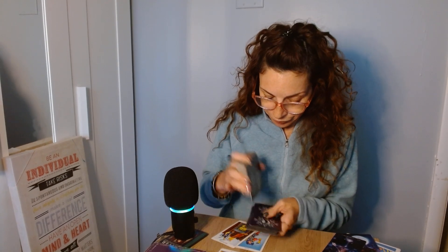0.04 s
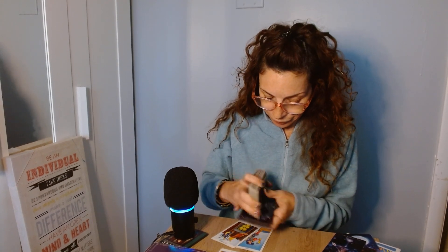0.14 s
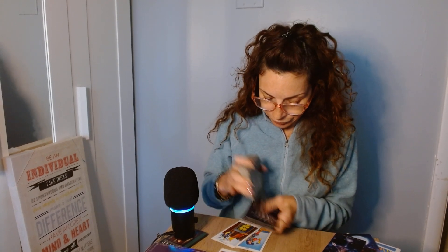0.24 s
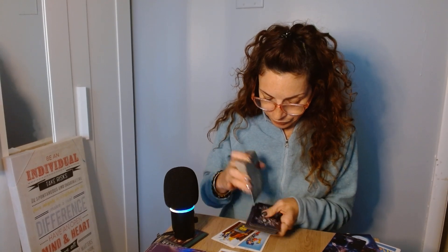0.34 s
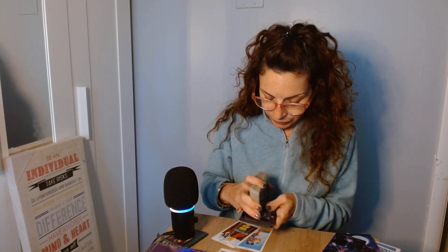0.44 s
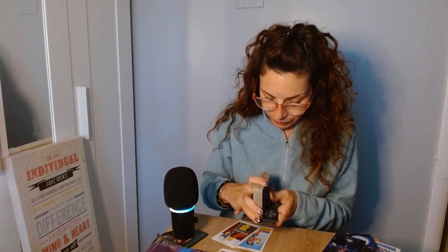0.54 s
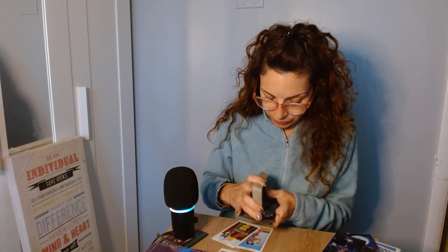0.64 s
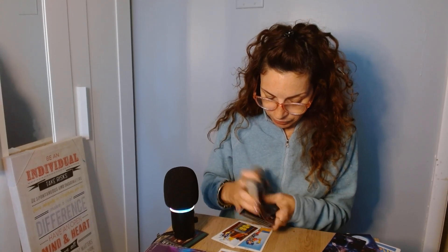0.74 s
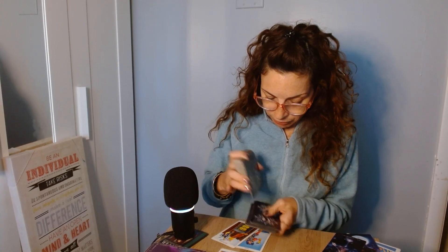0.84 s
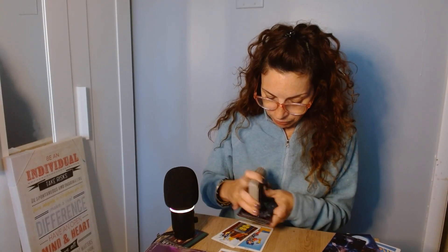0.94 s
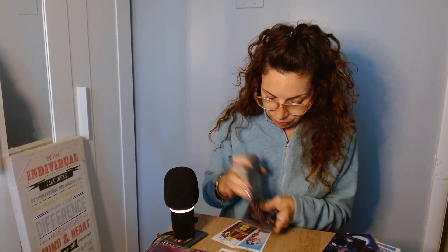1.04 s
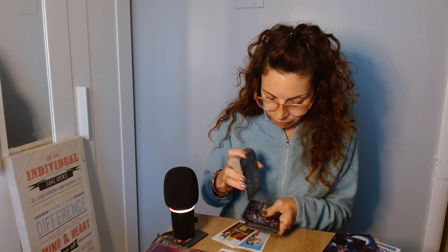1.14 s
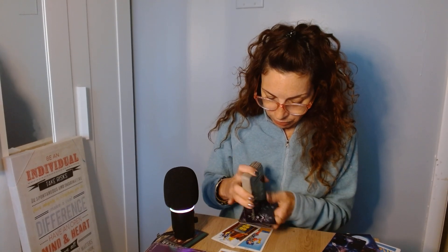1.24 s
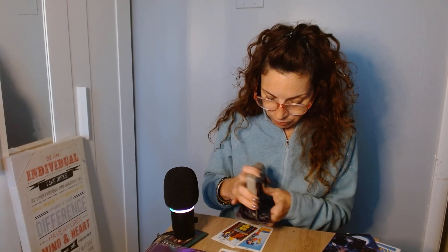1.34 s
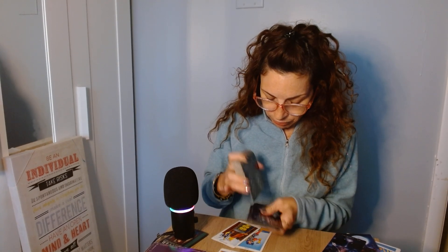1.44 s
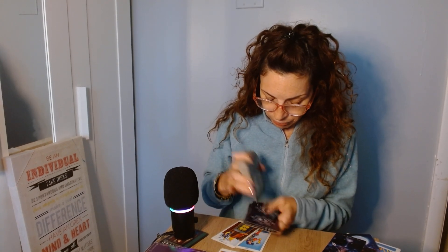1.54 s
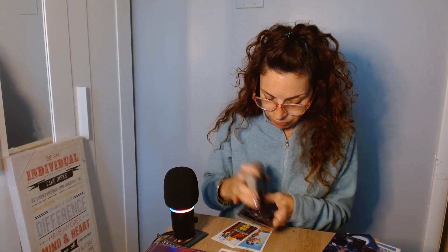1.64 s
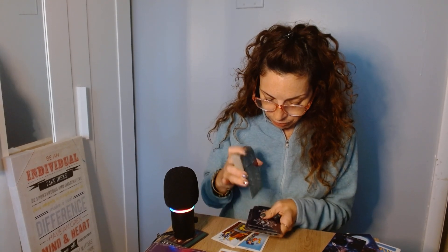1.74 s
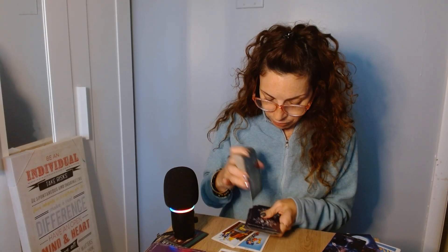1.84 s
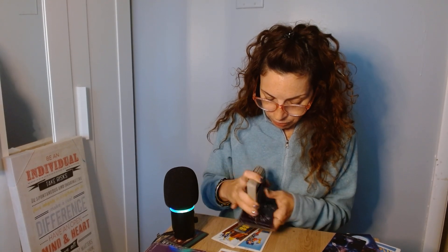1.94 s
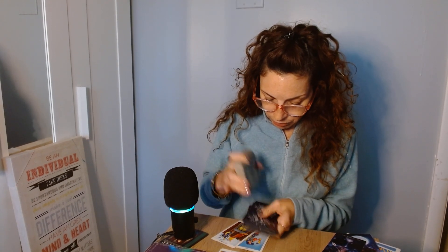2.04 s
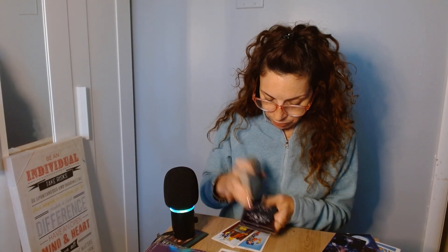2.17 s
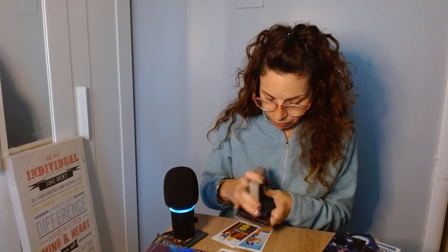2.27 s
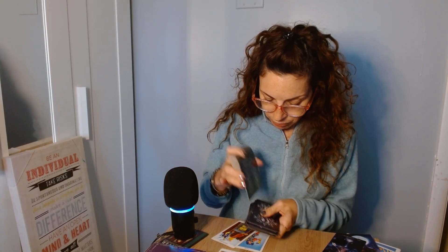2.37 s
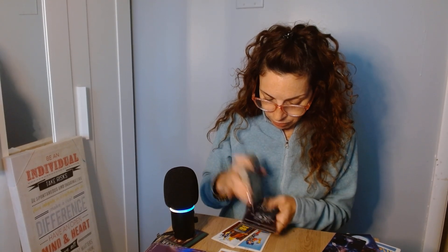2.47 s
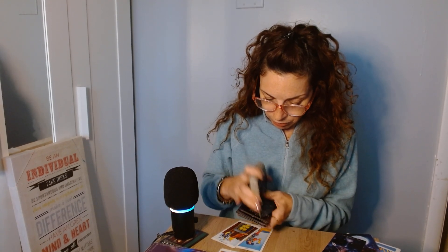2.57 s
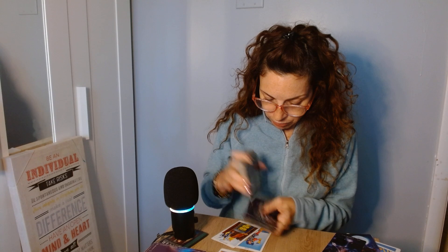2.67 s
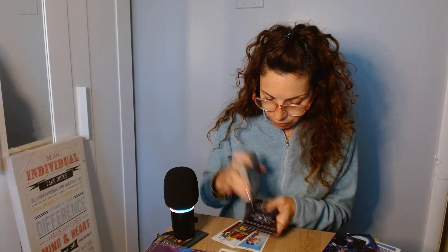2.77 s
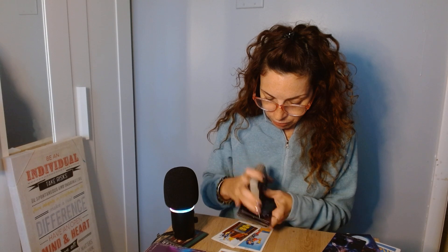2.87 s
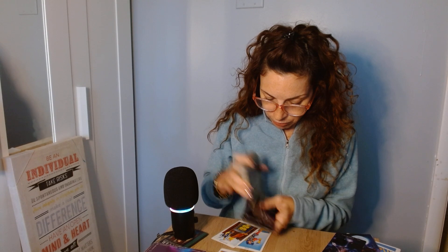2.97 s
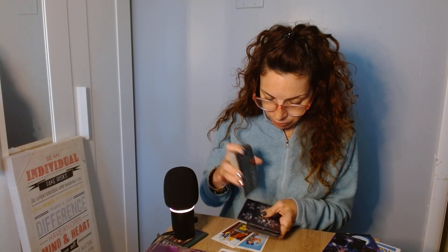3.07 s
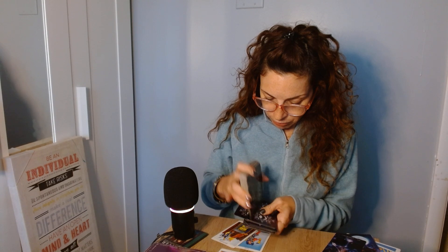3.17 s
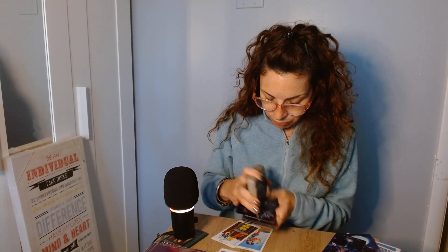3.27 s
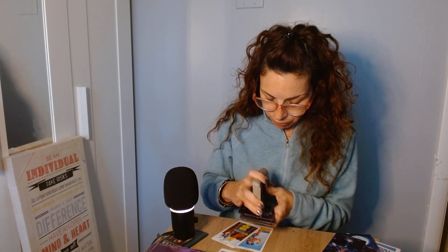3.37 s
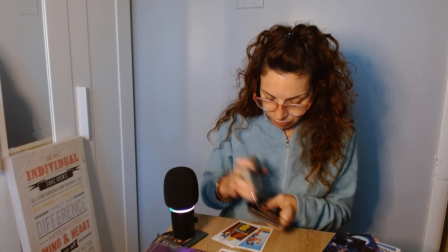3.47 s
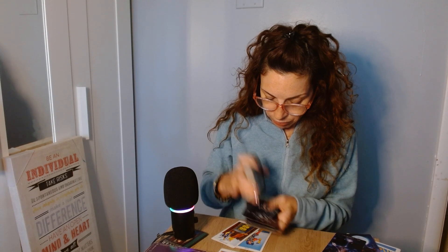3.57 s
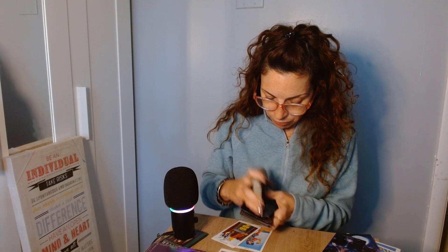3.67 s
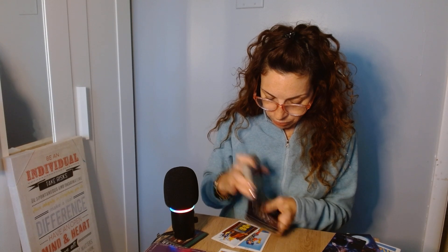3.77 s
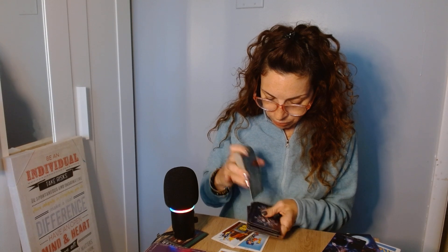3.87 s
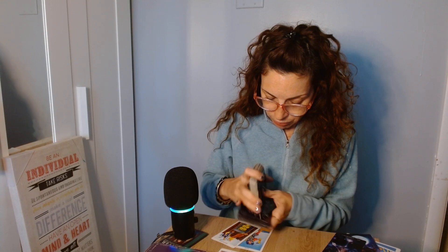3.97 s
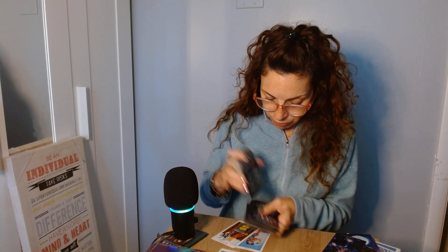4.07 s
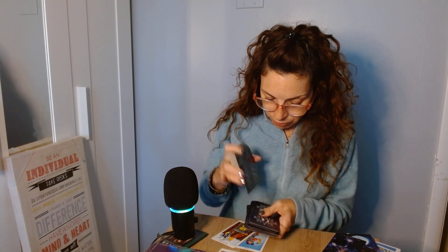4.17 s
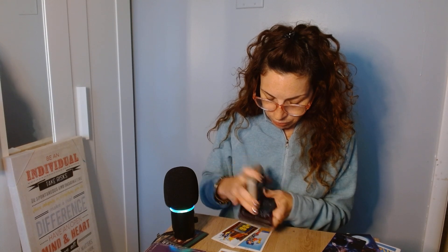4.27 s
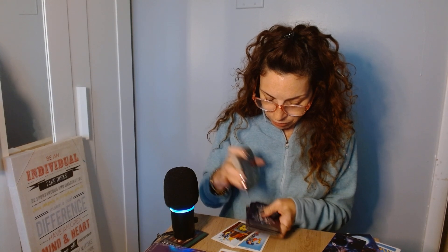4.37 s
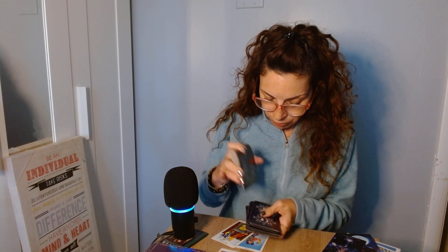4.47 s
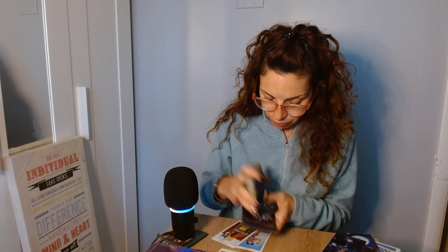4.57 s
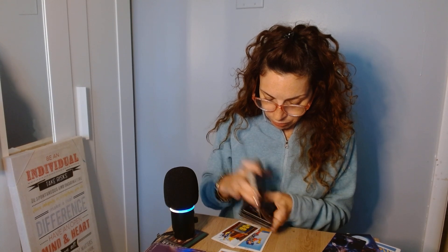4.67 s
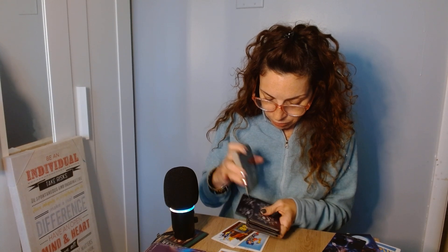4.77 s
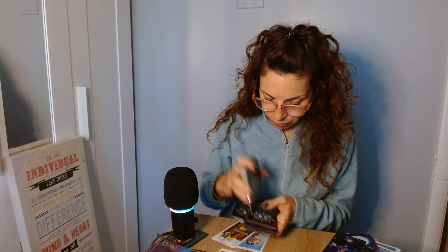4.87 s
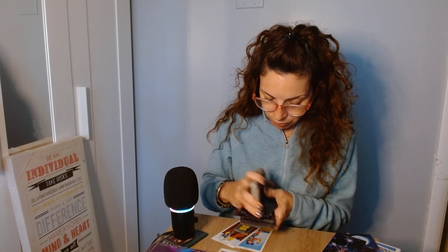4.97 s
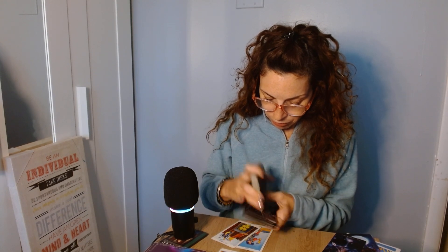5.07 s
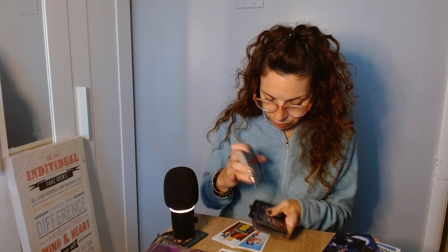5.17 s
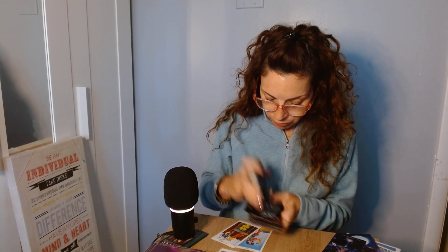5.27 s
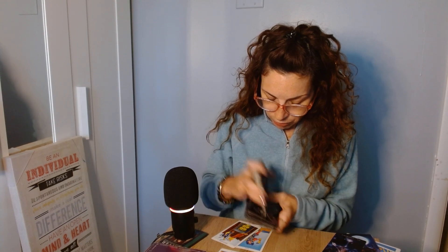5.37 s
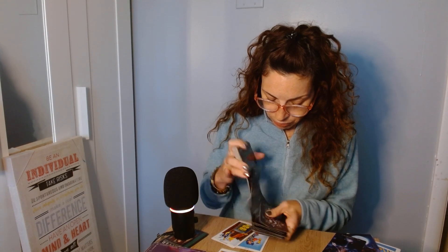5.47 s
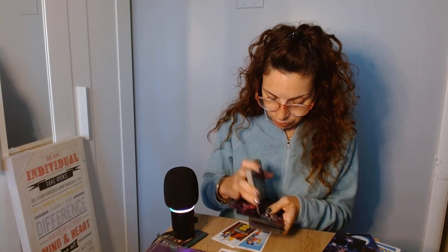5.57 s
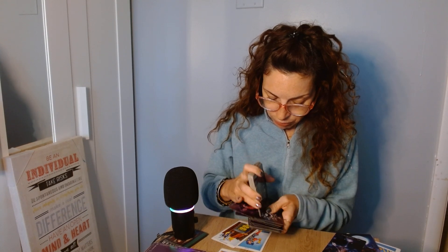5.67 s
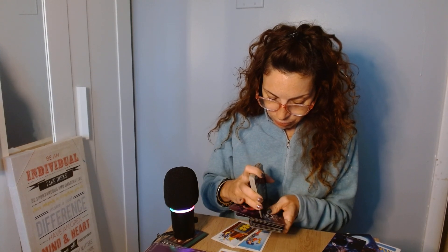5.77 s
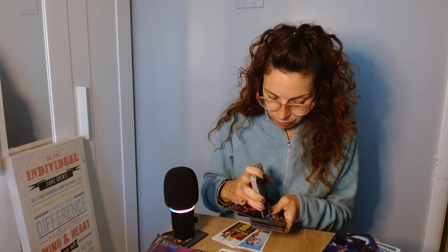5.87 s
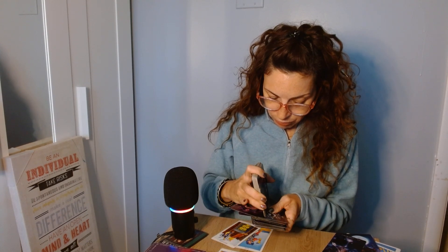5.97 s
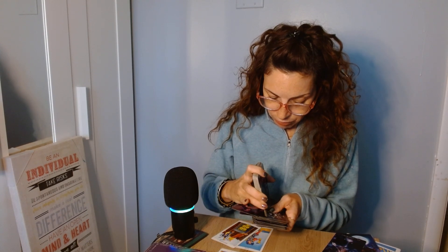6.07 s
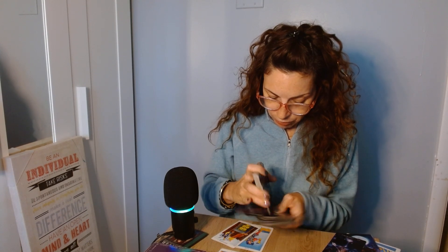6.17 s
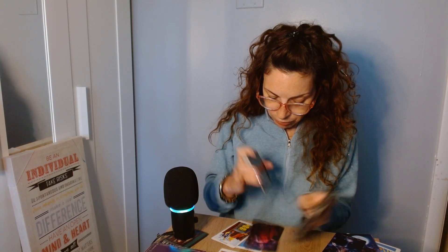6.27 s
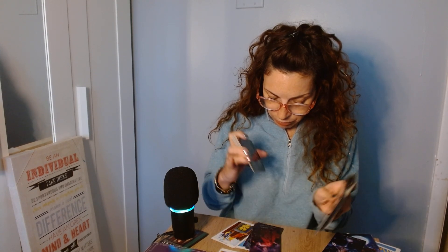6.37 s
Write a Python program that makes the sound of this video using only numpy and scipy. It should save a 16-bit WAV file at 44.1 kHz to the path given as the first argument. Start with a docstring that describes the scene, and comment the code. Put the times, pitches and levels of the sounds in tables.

```python
"""Shuffling a deck of cards

A deck of stiff cards is shuffled overhand above a wooden table, close to a desk microphone in a small quiet room.
Packets slide off the deck with a hiss (shaped noise), and card edges click and slap (short decaying tones).
Each drop thumps into the palm and shakes the table (low pulses and noise); after a pause the hands start again.
Mains hum, a thin whine (both sine waves) and faint hiss lie under it."""
import sys
import numpy as np
from scipy import signal
from scipy.fft import rfft, irfft
from scipy.io import wavfile
from scipy.ndimage import uniform_filter1d

SR = 44100
rng = np.random.default_rng(int(sys.argv[2]) if len(sys.argv) > 2 else 0)


def put_to_file(sound):
    """Save the sound as 16-bit audio at rate SR, in the file named by the first command-line argument."""
    columns = np.atleast_2d(sound).T  # one column per channel
    safe = np.clip(columns, -1, 1)
    whole_steps = np.round(safe * 32767)
    wavfile.write(sys.argv[1], SR, whole_steps.astype(np.int16))


def volts_from_decibels(level):
    """Turn decibel levels (scalar or array-like) into linear amplitude factors."""
    exponent = np.asarray(level, float) / 20
    return 10 ** exponent


N = 282681
TIME = np.arange(N) / SR


def unit(x):
    """Scales a sound to rms 1, so that a level can be set afterwards."""
    return x / np.sqrt(np.mean(x ** 2))


def resonate(x, peaks):
    """Sum of resonances, each letting through a band of x around its own pitch."""
    total = 0
    for hz, width_hz, db in peaks:
        total = total + volts_from_decibels(db) * signal.lfilter(*signal.iirpeak(hz, hz / width_hz, SR), x)
    return total


def ring(t, hz, t60_s, phase=0.):
    """One ringing tone that falls by 60 dB in t60_s."""
    return np.exp(-np.log(1000) * t / t60_s) * np.sin(2 * np.pi * hz * t + phase)


def walk(rate_hz):
    """A slowly wandering random curve: levels held for 1 / rate_hz seconds, smoothed twice; spread near 1."""
    hold = int(SR / rate_hz)
    steps = np.repeat(rng.standard_normal(N // hold + 1), hold)
    return 1.15 * uniform_filter1d(uniform_filter1d(steps, hold), hold)[:N]


def add(out, start_s, sound):
    """Mixes a short sound in at start_s."""
    i = int(start_s * SR)
    out[i:i + len(sound)] += sound[:N - i]


def quiet():
    """Hiss (shaped noise), wavering mains hum and a thin electrical whine (sine waves)."""
    hiss_db, hum_db, whine_db = -77, -75.5, -99  # rms levels
    hum_hz, whine_hz = 60, 2584
    # Tone colour of the hiss. Each row: frequency in Hz, relative level in dB per Hz.
    hiss_colour = [(25, 8.5), (100, 0.5), (400, -13.5), (1000, -16), (3000, -19), (9000, -23),
                   (16000, -30.5)]
    hz, db = np.transpose(hiss_colour)
    bins_hz = np.maximum(np.fft.rfftfreq(N, 1 / SR), 10)
    colour = volts_from_decibels(np.interp(np.log(bins_hz), np.log(hz), db))
    hiss = irfft(rfft(rng.standard_normal(N)) * colour, N)
    hum = volts_from_decibels(hum_db + 2.7 * walk(25)) * np.sin(2 * np.pi * hum_hz * TIME)
    whine = volts_from_decibels(whine_db + 2 * walk(23)) * np.sin(2 * np.pi * whine_hz * TIME)
    return volts_from_decibels(hiss_db) * unit(hiss) + np.sqrt(2) * (hum + whine)


def rubbing():
    """Card on card: grainy friction noise in a dull and a bright band, with stray ticks and hand rumble."""
    # Fingers and cards rubbing between the strokes, still during the pause.
    # Each row: time in seconds, level in dB.
    rustle = [(0, -55.5), (.05, -66), (.12, -69.5), (.3, -71), (2.2, -76), (5.66, -72), (5.74, -100),
              (6.11, -100), (6.14, -77.5), (6.2, -71.5), (6.41, -83)]
    # Packets sliding off the deck until they catch.
    # Each row: time of the catch in seconds, level in dB, swell in ms, brightness (bright over dull) in dB.
    slides = [(0.27, -33.5, 20, 2.5), (.529, -53, 8, -8), (.745, -42, 22, -12.5), (0.793, -33, 22, -12.5),
              (1.121, -39, 43.4, -3), (1.24, -56.5, 28, 3.5), (1.328, -55, 14, -8), (1.426, -38.5, 31, -12),
              (1.442, -27.5, 6.3, -7), (1.671, -46, 16, -15), (1.702, -32.5, 10, 4.5),
              (1.929, -56.5, 16, -25), (2.015, -50, 16, -6), (2.043, -33, 8, -8.5),
              (2.279, -55.5, 6.7, -1.5), (2.363, -26, 6.5, 7.5), (2.664, -30.5, 12, -3),
              (2.832, -56, 5.7, 29), (2.942, -38, 11, -9.5), (2.975, -40.5, 29, -5.5),
              (3.006, -27.5, 13, 9.5), (3.437, -41.5, 33, -16.5), (3.477, -34, 19, -19.5),
              (3.734, -44.5, 16, -10.5), (3.784, -33, 17, 2.5), (4.086, -35.5, 22, -2.5),
              (4.304, -50.5, 8, -2.5), (4.335, -49, 5.9, -0.5), (4.379, -33, 19, -7), (4.547, -53, 5.2, 32),
              (4.715, -41.5, 22, -6), (4.763, -42.5, 70, -9), (4.78, -42.5, 10, -7), (4.878, -54, 12, 18),
              (4.947, -52, 21, 0), (5.089, -41.5, 12, -16), (5.125, -30.5, 12, -22), (5.616, -55, 73, -1),
              (5.697, -53.5, 3.9, -27), (6.281, -44.5, 9.7, -29)]
    # The deck knocked and dragged on as it is gripped again.
    # Each row: time of the peak in seconds, level in dB, fade in ms, brightness in dB.
    drags = [(2.298, -50.5, 60, -8), (2.517, -58.5, 35, 3.5), (2.6, -58.5, 123, -2.5), (3.132, -56, 32, 27),
             (3.637, -51.5, 27, -29), (3.938, -61, 21, -1.5), (5.29, -48, 46, -26)]
    # Short and longer rubs of the deck that swell and fade evenly.
    # Each row: time of the peak in seconds, level in dB, swell and fade in ms.
    even_rubs = [(.63, -63, 29), (2.15, -65.5, 11.4), (2.45, -62, 11), (3.31, -54.5, 44), (5.02, -51, 80),
                 (5.42, -46, 54)]
    # Resonances of the rubbed card surface, dull and bright.
    # Each row: frequency in Hz, width in Hz, relative level in dB.
    dull_peaks = [(1112, 450, 6), (3050, 1600, 13.5), (4630, 810, -7.5)]
    bright_peaks = [(7700, 2300, 7), (10700, 5100, -11), (11700, 2700, -15.5)]
    slide_stop_ms, drag_start_ms, even_bright_db = 9.5, 2.7, -11
    swell_shape, stop_shape = 1.51, 3.1  # higher = flatter top and steeper flank
    grain_db, flicker_db, stutter_db = 3, 3, 5  # random wavering: fine, slower, and in light rubbing
    tick_rate_hz, tick_db, tick_fade = 110, 17, 0.28
    rumble_db = -11  # against the dull rubbing

    # each rub: time of the peak, level, swell, stop, brightness
    rubs = [(s - slide_stop_ms / 1000, db, ms, slide_stop_ms, bright_db) for s, db, ms, bright_db in slides]
    rubs += [(s, db, drag_start_ms, ms, bright_db) for s, db, ms, bright_db in drags]
    rubs += [(s, db, ms, ms, even_bright_db) for s, db, ms in even_rubs]
    dull_power = volts_from_decibels(np.interp(TIME, *np.transpose(rustle))) ** 2
    bright_power = dull_power.copy()
    for s, db, swell_ms, stop_ms, bright_db in rubs:
        # falls to a quarter of the power one swell before and one stop after the peak
        near = slice(max(int((s - .6) * SR), 0), int((s + .6) * SR))
        before = TIME[near] < s
        apart = np.abs(TIME[near] - s) * 1000 / np.where(before, swell_ms, stop_ms)
        power = (1 / 4) ** np.minimum(apart ** np.where(before, swell_shape, stop_shape), 40)
        dull_power[near] += power * volts_from_decibels(db - max(bright_db, 0)) ** 2
        bright_power[near] += power * volts_from_decibels(db + min(bright_db, 0)) ** 2
    dull_level, bright_level = np.sqrt(dull_power), np.sqrt(bright_power)

    ticks = (rng.random(N) < tick_rate_hz / SR) * volts_from_decibels(tick_db + 10 * rng.random(N))
    ticks *= np.minimum(volts_from_decibels(-69.5) / dull_level, 1) ** tick_fade  # loud slides drown their own ticks
    # light rubbing sticks and slips; a loud slide runs more evenly
    lightness = np.clip(volts_from_decibels(-60.5) / dull_level, 0, 1)
    stutter = volts_from_decibels(stutter_db * walk(90) * lightness)
    surface = stutter * rng.standard_normal((2, N)) * volts_from_decibels(grain_db * walk(600)) + ticks
    dull = unit(resonate(surface[0], dull_peaks))
    bright = unit(resonate(np.diff(surface[1], prepend=0), bright_peaks))  # diff tilts towards treble
    out = dull_level * volts_from_decibels(flicker_db * walk(60)) * dull
    out += bright_level * volts_from_decibels(flicker_db * walk(55)) * bright
    rumble = unit(resonate(rng.standard_normal(N), [(74, 93, 8), (206, 370, -11)]))  # Hz, width Hz, dB
    return out + volts_from_decibels(rumble_db + 6.7 * walk(25)) * uniform_filter1d(dull_level, 900) * rumble


def clicks():
    """Every blow rings the packet in several tones, a little shifted each time; loose cards chatter after it."""
    # Card edges meeting, then cards slapping flat against each other.
    # Each row: start in seconds, body level in dB before the trim, brightness (edge over body) in dB.
    edge_blows = [(0.08, -74, 33), (0.1198, -46, 9), (0.1309, -24.5, -9.5), (0.1954, -26.5, -15),
                  (0.2694, -26.5, -3), (0.388, -23.5, -0.5), (0.4098, -36.5, 6), (0.5213, -39, 0),
                  (0.6924, -40, -20), (0.7909, -31, -2.5), (0.924, -40.5, 5.5), (0.93, -21.5, -1.5),
                  (0.9887, -24.5, -16), (1.0041, -34, -11.5), (1.12, -24, 3), (1.129, -18.5, 3),
                  (1.1488, -37, -7.5), (1.3564, -38, -1), (1.577, -35, -9.5), (1.5822, -35.5, 11),
                  (1.59, -29.5, 2.0), (1.8682, -39.5, 9.5), (1.8768, -32, -0.5), (1.9657, -37.5, 5),
                  (1.9708, -27, -5.5), (2.029, -20, -8), (2.0444, -24, 7.5), (2.2915, -49.5, 0.0),
                  (2.2985, -30, -9), (2.3633, -27.5, -1), (2.5129, -36.5, 0.5), (2.5184, -25.0, -1.5),
                  (2.5964, -20.5, -15.5), (2.6688, -28.5, 0), (2.8402, -24.5, -8.5), (2.8461, -31.5, -10),
                  (2.8616, -35.5, -18.5), (2.9053, -33.5, -5), (3.011, -26.5, -0.5), (3.0173, -17, -7.5),
                  (3.1302, -71.5, 35.5), (3.144, -42, -18), (3.1652, -48, -1), (3.2577, -44.5, -28),
                  (3.289, -43, -10), (3.3122, -34.5, -22), (3.3814, -35.5, -12.0), (3.6316, -33.5, -9),
                  (3.6528, -36.5, -7), (3.6956, -35, -6), (3.785, -30.5, 14), (3.925, -36.5, -4),
                  (3.9421, -31, -6.5), (3.9514, -36, -11), (3.9639, -31.0, -15), (3.994, -46, -11.5),
                  (4.0162, -45, 2), (4.088, -29, 6), (4.164, -59, 11), (4.2456, -23, -6.5),
                  (4.283, -35.5, -7), (4.3473, -23.5, 5), (4.541, -73.5, 33), (4.561, -42.5, -3),
                  (4.574, -28.5, -14), (4.5824, -32, -12), (4.5858, -35, -13.0), (4.6299, -37.0, -1),
                  (4.653, -38, -13.0), (4.7655, -18.5, -3), (4.7765, -19.5, -18), (4.861, -62.5, 28.5),
                  (4.887, -46, -5), (4.901, -35, -1.5), (4.9207, -36.5, -11), (4.959, -42.5, -4),
                  (5.1155, -20, -2), (5.121, -27.5, 2), (5.2829, -31.5, -6), (5.2897, -32.5, -6),
                  (5.343, -32.0, -12), (5.497, -31, -5), (5.5182, -38.5, 6.5), (5.5509, -25, 1),
                  (5.5602, -33.5, -4.5), (5.5792, -25, -4), (5.6463, -48, -22), (6.2315, -41.5, 6)]
    flat_slaps = [(0.1287, -34, 0.5), (0.1376, -24.5, -12.5), (0.1457, -39.5, -1), (0.4148, -23, -4.5),
                  (0.4199, -21.5, -6), (0.7414, -35.0, 4), (0.7707, -20, -7), (0.9384, -21.5, -8.5),
                  (0.9479, -35, -3), (1.414, -41.5, 10), (1.7043, -30, -4.5), (1.782, -52, 6.5),
                  (2.0377, -30, -2), (2.836, -41, -3), (3.4162, -33, 0), (3.4206, -30.0, -20),
                  (3.466, -20, -8.5), (3.518, -46.5, 2), (3.6414, -39.5, -3), (4.3685, -28.5, 2),
                  (4.3791, -28.5, 1.5), (4.6387, -22.5, -30), (4.7438, -44.0, 2), (5.018, -30.5, -9),
                  (5.022, -34, -9), (5.205, -58, 7), (5.2766, -35.5, -8), (5.3347, -47.5, 6.5),
                  (5.524, -38.5, -1), (6.253, -51.5, 10), (6.2708, -37, 10), (6.2734, -33, 4.0),
                  (6.2815, -36.5, 8)]
    # What a struck packet rings with.
    # Each row: frequency in Hz, relative level in dB, time to fall 60 dB in ms, part (0 body, 1 face, 2 edge).
    card_modes = [(490, -8, 4.1, 0), (777, -7.5, 5.4, 0), (990, 1, 4.06, 0), (1710, -3, 5, 0),
                  (2930, -5, 3.43, 1), (3553, 2, 1.69, 1), (4580, 0, 1.2, 1), (6300, 6.5, 1.3, 2),
                  (8360, 0, 3, 2), (12100, -11, 3, 2), (13600, -9.5, 5.4, 2)]
    # the face rings over the mean of body and edge: a little for an edge blow, much more for a flat slap
    edge_face_db, slap_face_db = 2.5, 10
    detune, rise_ms = .08, 0.056  # detune: spread of the pitches, about 8 %
    chatter_db, chatter_ms = -8, 1.73
    trim_db = 2

    out, t = np.zeros(N), np.arange(400) / SR
    hz, db, t60_ms, part = np.transpose(card_modes)[:, :, None]
    hits = [(*row, edge_face_db) for row in edge_blows] + [(*row, slap_face_db) for row in flat_slaps]
    contact = 1 - np.exp(-t * 1000 / rise_ms)
    for s, body_db, bright_db, over_db in hits:
        shift, phase = rng.standard_normal((2, len(card_modes), 1))
        # cubing the noise leaves a few strong blows among many weak ones
        blows = volts_from_decibels(chatter_db) * rng.standard_normal(len(t)) ** 3 * np.exp(-t * 1000 / chatter_ms) / 10
        blows[0] = 1  # the main blow
        modes = volts_from_decibels(db) * ring(t, hz * np.exp(detune * shift), t60_ms / 1000, 2 * phase)
        face_db = body_db + bright_db / 2 + over_db
        for k, part_db in enumerate((body_db, face_db, body_db + bright_db)):
            part_ring = modes[np.round(part[:, 0]) == k].sum(axis=0)
            snap = np.convolve(blows, contact * part_ring)
            add(out, s, volts_from_decibels(part_db + trim_db) * snap / np.abs(snap).max())
    return out


def thumps():
    """A soft push of air and palm, with a rattling knock and a settling rumble; it shakes the table."""
    # Packets landing in the palm. Each row: time of fullest push in seconds, level in dB before the trim, pitch in Hz.
    landings = [(0.272, -34, 156), (0.429, -44.5, 116), (0.789, -36.5, 203.6), (1.131, -37.5, 171.3),
                (1.286, -49, 142), (1.372, -39, 115), (1.42, -35, 106.3), (1.44, -43, 172.3),
                (1.707, -26.5, 112.2), (1.758, -47, 200), (1.955, -41, 77.6), (1.993, -41, 159.6),
                (2.044, -34, 88.8), (2.304, -38, 134), (2.365, -31.5, 127.4), (2.52, -43.5, 184),
                (2.599, -41, 182), (2.668, -35, 124.5), (3.016, -26, 185.7), (3.166, -47, 150),
                (3.474, -35, 210.5), (3.785, -32, 108.6), (3.995, -45.5, 76), (4.087, -26.5, 105.9),
                (4.284, -39.5, 238.7), (4.371, -33, 134), (4.609, -45, 82), (4.674, -46, 171),
                (4.769, -25, 125), (5.115, -30, 127.6), (5.284, -45, 237.5), (5.321, -53, 78.5),
                (5.489, -27, 91), (5.522, -33, 120), (5.552, -33.5, 163), (5.579, -32.5, 178.3),
                (5.609, -41, 119), (6.237, -45.5, 129), (6.257, -41.5, 182.2), (6.272, -37, 190.4),
                (6.301, -47, 110.4)]
    # What the table rings with.
    # Each row: frequency in Hz, relative level in dB, time to fall 60 dB in seconds.
    table_modes = [(58, -5, .07), (100, -7, .12), (247, -18, .26)]
    cycles = 1.29  # length of the push, in cycles of its pitch
    knock_db, knock_ms, settle_db, settle_ms = -8, 12, -18, 35
    table_db, trim_db = -3, 1

    out, blows, t = np.zeros(N), np.zeros(N), np.arange(8192) / SR
    noise = rng.standard_normal((len(landings), 2, len(t)))
    # resonances: Hz, width Hz, dB
    rattle = unit(resonate(noise[:, 0], [(287, 510, 8), (600, 490, -5.5)]))
    rumble = unit(resonate(noise[:, 1], [(70, 14, 14.5), (160, 47, -5.5), (467, 140, -22.5)]))
    for (s, db, hz), knock, settle in zip(landings, rattle, rumble):
        # the pressure swells to its peak in about a third of a cycle
        push = t * hz * np.exp(-4 * t * hz / cycles) * np.sin(2 * np.pi * hz * t)
        thump = push / np.abs(push).max()
        thump = thump + volts_from_decibels(knock_db) * knock * np.exp(-t * 1000 / knock_ms)
        thump = thump + volts_from_decibels(settle_db) * settle * np.exp(-t * 1000 / settle_ms)
        add(out, s - cycles / hz / 4, volts_from_decibels(db + trim_db) * thump)
        add(blows, s, volts_from_decibels(db + table_db) * np.hanning(100) / 50)
    t = np.arange(SR // 2) / SR
    table = sum(volts_from_decibels(db) * ring(t, hz, t60_s) for hz, db, t60_s in table_modes)
    return out + signal.fftconvolve(blows, table)[:N]


def room(x):
    """Dense echoes of a small room as fading noise, the treble dying slightly sooner."""
    low_t60_s, treble_t60_s, split_hz = 0.2, 0.19, 3000
    build_ms, echo_db = 4, -17
    t = np.arange(SR // 2) / SR
    noise = rng.standard_normal(len(t)) * (1 - np.exp(-t * 1000 / build_ms))
    low = signal.lfilter(*signal.butter(1, split_hz, fs=SR), noise)
    tail = low * volts_from_decibels(-60 * t / low_t60_s) + (noise - low) * volts_from_decibels(-60 * t / treble_t60_s)
    return volts_from_decibels(echo_db) * signal.fftconvolve(x, tail / np.sqrt(np.sum(tail ** 2)))[:N]


def scene():
    """Hands and cards, the echo of the cards and the quiet room."""
    # a card is too small to radiate bass
    snaps = signal.lfilter(*signal.butter(2, 260, "high", fs=SR), clicks())
    cards = snaps + rubbing()
    return (cards + room(cards) + thumps() + quiet())[None]


def band_limit(x):
    """A steep low-pass at the top of the band."""
    return signal.sosfilt(signal.butter(12, 17040, fs=SR, output="sos"), x)


def record(dry):
    """The microphone drops the deepest bass, softens the top and rounds the sharpest peaks."""
    band = signal.butter(2, [32, 14500], "band", fs=SR, output="sos")
    mic = signal.sosfilt(band, dry)
    return band_limit(np.tanh(2 * mic) / 2)


dry = scene()
out = record(dry)
put_to_file(out)
```